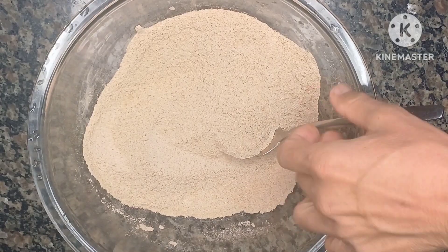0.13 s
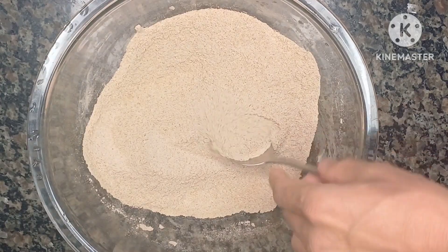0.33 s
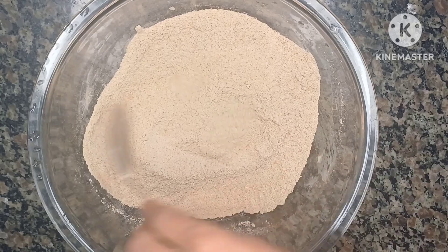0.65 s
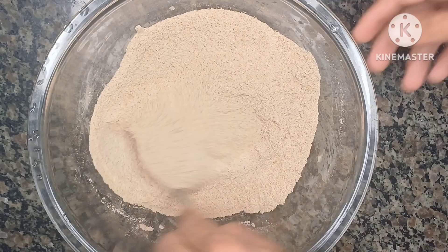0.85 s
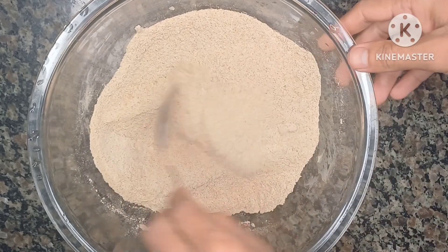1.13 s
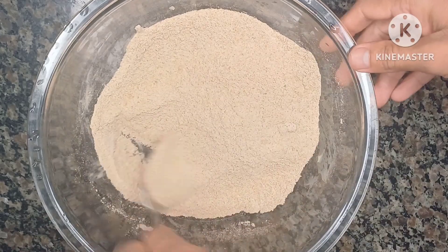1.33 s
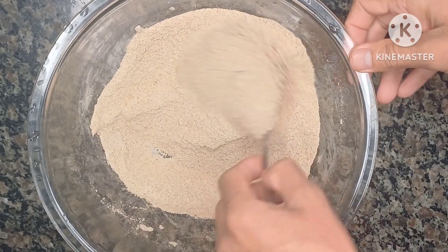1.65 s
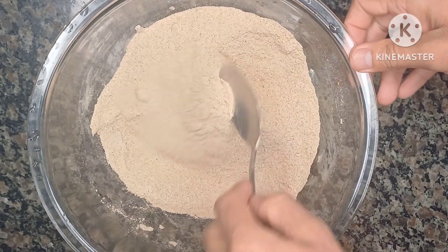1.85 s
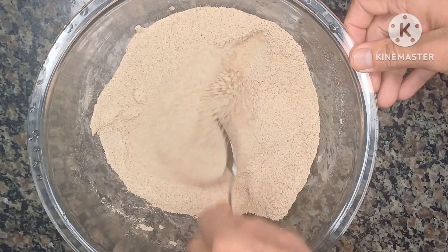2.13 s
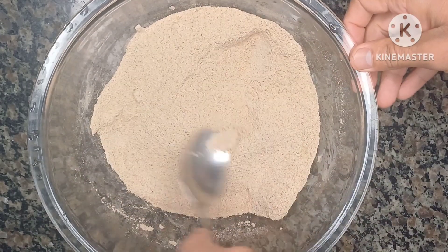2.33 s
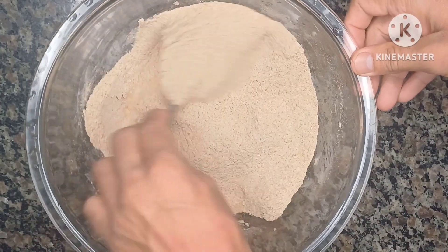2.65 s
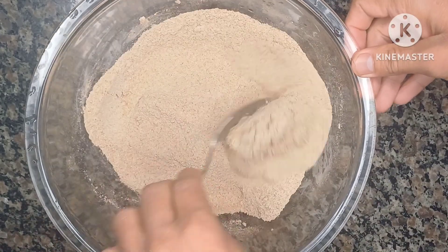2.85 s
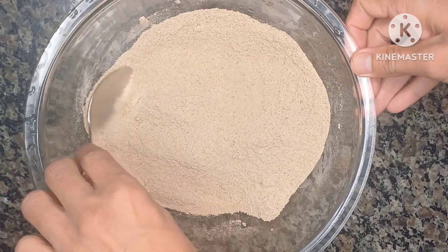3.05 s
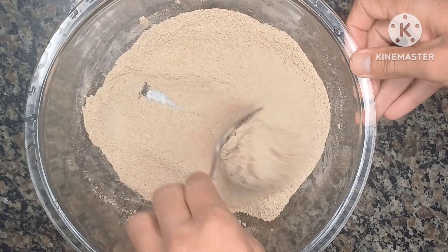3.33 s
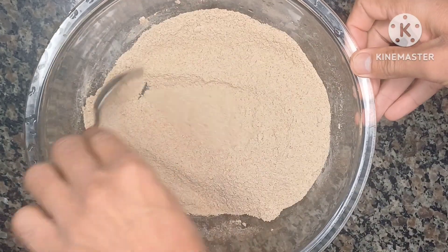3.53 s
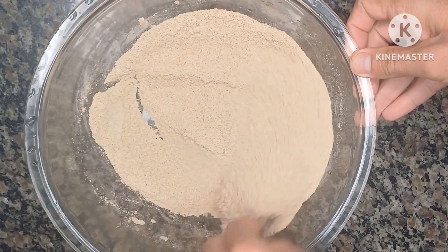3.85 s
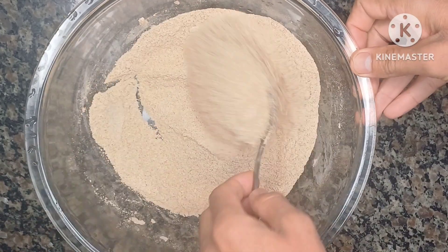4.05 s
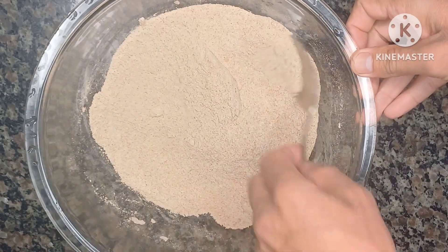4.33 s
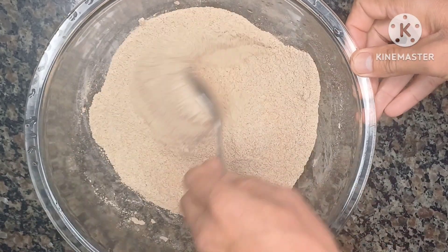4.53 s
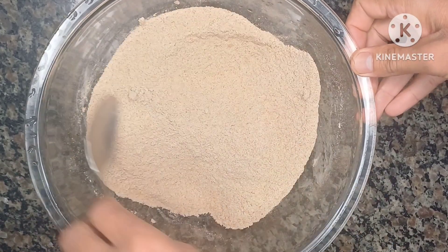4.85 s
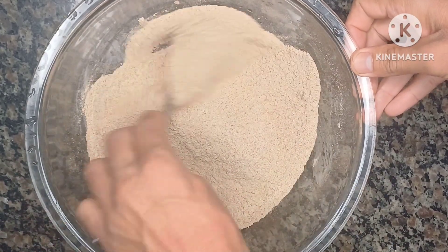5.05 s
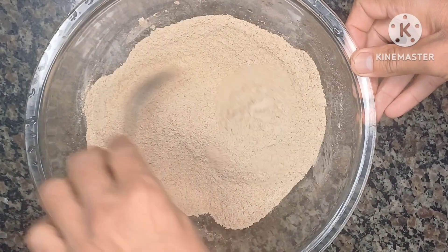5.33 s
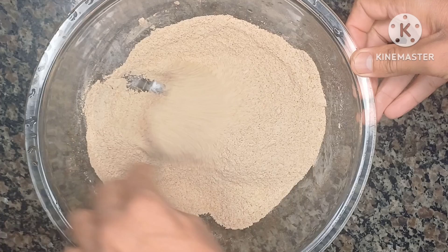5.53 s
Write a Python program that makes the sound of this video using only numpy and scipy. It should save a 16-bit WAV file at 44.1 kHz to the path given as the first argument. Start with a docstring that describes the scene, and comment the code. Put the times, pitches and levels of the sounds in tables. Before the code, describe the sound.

A metal spoon stirs dry flour and sugar in a glass bowl, in about eight short, uneven strokes. Each is a soft, gritty scrape with a hiss of sliding grains and light knocks on the powder-covered glass. Late on, the handle clinks against the rim and rings briefly. The bowl rocks softly on the counter. It is heard up close in a hard-walled kitchen with a faint appliance hum.

```python
"""Stirring flour and sugar

A metal spoon stirs flour and sugar in a glass bowl on a stone counter, in a hard-walled kitchen.
Each stroke crunches powder, grinds sugar against the glass and sets grains sliding. The spoon knocks
on the powder-covered bottom, rings in two short spells as its handle touches the rim, and squeaks
once. The bowl rocks softly on the counter, and an appliance hums underneath."""
import sys
import numpy as np
from scipy import signal
from scipy.fft import rfft, irfft
from scipy.io import wavfile
from scipy.ndimage import uniform_filter1d

SR = 44100
rng = np.random.default_rng(int(sys.argv[2]) if len(sys.argv) > 2 else 0)


def unload_audio(sound):
    """Save the sound as a 16-bit wav file, at the path given as the first command line argument."""
    columns = np.transpose(np.atleast_2d(sound))
    # keep every value between -1 and 1, then stretch to whole-number steps
    steps = np.round(np.clip(columns, -1, 1) * 32767)
    wavfile.write(sys.argv[1], SR, steps.astype(np.int16))


N = 251325
TIME = np.arange(N) / SR
FREQ = np.maximum(np.arange(2 ** 17 + 1) * SR / 2 ** 18, 1)  # the frequencies [Hz] that filters act on

# tone of the room's low rumble: (frequency [Hz], level [dB])
RUMBLE_TONE = [(25, -48.5), (45, -14.5), (76, -4), (105, -12.5), (200, -8.5), (330, -18), (600, -32.5),
               (1500, -41.5), (4500, -51.5), (15000, -50.5)]
# tones of the appliance's hum: (frequency [Hz], level [dB])
HUM_TONES = [(59.3, -49.5), (119.3, -56.5), (197, -69), (2860, -92.5)]
# noisy bands of its whirr: (frequency [Hz], width [Hz], level [dB])
WHIRR_BANDS = [(121.6, 17, -56.5), (6740, 530, -76.5)]
# the hand-held spoon's modes, or natural notes: (frequency [Hz], level [dB], time to fade 60 dB [s])
SPOON_MODES = [(441.5, -10, 0.33), (1109, -4, 0.048), (1137, -12, 0.33), (2150, -10, 0.33),
               (3315, -6.5, 0.19), (3360, -7.5, 0.1), (3520, -1.5, 0.069), (4780, -6.5, 0.096),
               (5170, -11, 0.061), (6153, -1.5, 0.086), (6190, -14, 0.42), (7140, -8.5, 0.12),
               (7700, -9.5, 0.086), (8460, -10.5, 0.23), (9700, -2, 0.071)]
# high modes of the spoon's cup: (frequency [Hz], width [Hz], level [dB])
CUP_MODES = [(7250, 700, -4), (8600, 400, -9), (9400, 300, -8), (11700, 550, -1), (12650, 450, -2),
             (13950, 400, -1), (14900, 700, -2)]
# modes of bowl and spoon, damped by powder and hand: (frequency [Hz], width [Hz], level [dB])
BOWL_MODES = [(424.4, 107, 0.5), (583, 340, -2.5), (887, 252, 16), (1080, 110, -3), (1650, 400, 14),
              (2163, 138, -6), (2650, 380, 3), (3280, 430, 3), (4500, 310, -2), (5470, 770, -10.5),
              (6300, 410, -54)]
# tone of grains cracking under a knock: (frequency [Hz], level [dB])
CRACK_TONE = [(600, -12), (1300, -19.5), (1750, -9), (2200, -1), (2700, 5.5), (4000, -12.5), (5200, -1.5),
              (7000, -17.5), (15000, -46)]
# tone of the filled bowl's thud: (frequency [Hz], level [dB])
THUD_TONE = [(25, -48), (60, -20), (130, -18.5), (260, -8), (480, -7), (680, -8.5), (1050, -5), (1400, -12),
             (2500, -25.5), (6000, -45.5)]
# tone of ticking, hissing grains: (frequency [Hz], level [dB])
GRAIN_TONE = [(2500, -2), (5000, 10.5), (7500, 5.5), (9800, 5.5), (12000, 11.5), (16000, 1.5)]
# the handle touches the bare rim: (time [s], level [dB], brightness [Hz])
RIM_TOUCHES = [(0.2553, -44, 1700), (0.2778, -45, 1940), (4.3306, -26, 13600), (4.3425, -25, 6900),
               (4.4343, -38, 2000)]
# the spoon hits the covered glass:
# (time [s], level [dB], weight [0 = edge catches, 1 = whole spoon lands], ping [Hz])
SPOON_KNOCKS = [(0.8693, -31.5, 0.16, 2500), (0.964, -33, 0.67, 890), (1.099, -59, 0.95, 450),
                (1.3064, -29, 0, 2650), (1.3725, -26.5, 0.025, 2617), (1.431, -27.5, 0.46, 1610),
                (2.0864, -18, 0.71, 1975), (2.6156, -28, 0.48, 1850), (2.645, -26, 0.66, 1650),
                (3.1272, -43, 0.13, 5400), (3.2214, -32, 0.18, 2590), (3.5827, -32.5, 0.78, 6100),
                (3.7193, -17, 0.0, 3570), (3.7635, -23, 0.38, 984), (4.329, -29.5, 0.91, 5060),
                (4.468, -30.5, 0.55, 1710), (5.0461, -29.5, 0, 1670), (5.129, -32, 0.82, 2340),
                (5.452, -39.5, 0.56, 6540), (5.5186, -29, 0.32, 2760), (5.5451, -23, 0.32, 2630)]
# powder slides off the spoon between strokes: (time [s], half length [s], level [dB])
SPILLS = [(.62, 0.092, -67.5), (1.11, 0.046, -63.5), (2.065, 0.046, -54.5), (2.85, 0.1, -65.5),
          (3.43, 0.034, -64)]
# strokes over the bottom: (start [s], length [s], run-in through the heap [s], force [dB],
# loose grains [dB], time of the press [s], press [dB], rocking [dB], plunge [dB])
STIR_STROKES = [(0.86, 0.122, 0.069, -44.5, -52, 0.9, 1, -46, 8.5),
                (1.287, 0.334, 0.0032, -44.5, -46.5, 1.463, 8, -53.5, 7.5),
                (2.549, 0.17, 0.028, -49, -52.5, 2.665, -7, -44.5, 2),
                (3.094, 0.1516, 0.0017, -53.5, -51, 3.222, 9.5, -48.5, 18),
                (3.58, 0.402, 0.001, -47.5, -47, 3.68, 11, -57, 16.5),
                (4.325, 0.1534, 0.00082, -46.5, -49.5, 4.47, 2.5, -49.5, 15.5),
                (4.989, 0.14, 0.017, -50, -54.5, 5.02, 9, -47, 7.5),
                (5.449, 0.22, 0.002, -51.5, -57.5, 5.562, 16, -62, 17.5)]


def undb(db):
    """Turn decibels into a gain to multiply by."""
    return 10 ** (np.asarray(db) / 20)


def unit(x):
    """Scale a sound to an average (rms) level of 1."""
    return x / np.sqrt(np.mean(x ** 2))


def shape(x, response):
    """Pass a sound through a filter given at each frequency in FREQ."""
    return irfft(rfft(x, 2 * len(FREQ) - 2) * response)[..., :x.shape[-1]]


def colour(points):
    """A filter through (frequency [Hz], level [dB]) points that never sounds ahead of its input."""
    hz, db = np.transpose(points)
    curve_db = np.interp(np.log(FREQ), np.log(hz), db)
    cepstrum = irfft(np.log(undb(curve_db)))
    cepstrum[1:len(FREQ) - 1] *= 2
    cepstrum[len(FREQ):] = 0
    return np.exp(rfft(cepstrum))


def resonance(hz, width):
    """A filter that lets through a band around hz."""
    return 1 / (1 + 1j * (FREQ ** 2 - hz ** 2) / (FREQ * width))


def wander(rate):
    """A smooth random wobble, about 1 in size, that turns about `rate` times a second."""
    hold = int(SR / rate)
    steps = np.repeat(rng.standard_normal(N // hold + 1), hold)
    return 1.136 * uniform_filter1d(steps, hold)[:N]


def clicks(rate, spread_db):
    """Tiny fractures of uneven size at random times, about `rate` a second."""
    size = undb(spread_db * np.clip(rng.standard_normal(N), -2, 2))
    return (rng.random(N) < rate / SR) * size * rng.choice([-1, 1], N)


def swells(table):
    """A gain that rises and falls softly around each row's time."""
    return sum(undb(db) * np.exp(-((TIME - s) / half) ** 2) for s, half, db in table)


def modes(drive, table):
    """Natural notes that flare and fade one by one as the point of contact wanders."""
    out = 0
    for hz, width, db in table:
        b, a = signal.iirpeak(hz, hz / (1.7 * width), fs=SR)
        flare_db = 4 * wander(28)
        out = out + undb(db + flare_db) * signal.lfilter(b, a, signal.lfilter(b, a, drive))
    return out


def background(rumble_db=-54, waver_db=4.0, bass_side=0.34):
    """An appliance's wavering hum and its whirr, over a low room rumble."""
    def air():
        mid, side = rng.standard_normal((2, N))
        return mid + np.array([[1], [-1]]) * shape(side, np.clip(FREQ / 700, bass_side, 1))
    out = undb(rumble_db) * unit(shape(air(), colour(RUMBLE_TONE)))
    for hz, width, db in WHIRR_BANDS:
        out += undb(db) * unit(shape(air(), resonance(hz, 2 * width) ** 2))
    for hz, db in HUM_TONES:
        level = np.sqrt(2) * undb(db + waver_db * wander(4.47))
        out += level * np.sin(2 * np.pi * hz * TIME + 0.29 * wander(4.0))
    return out


def kitchen(x, to_walls, low_fade_s=0.35, high_fade_s=0.26, build_s=0.001, treble_db=-1,
            pan_db=2.67, lead_s=0.0001273):
    """The direct sound is earlier on the left and louder on the right; hard walls add an echoing tail."""
    t = TIME[:SR]
    mid, side = rng.standard_normal((2, SR))
    side = shape(side, FREQ / np.hypot(FREQ, 350))  # left and right share the bass
    echoes = (mid + np.array([[1], [-1]]) * side) / np.sqrt(2)
    lows = shape(echoes, 1 / (1 + (FREQ / 4000) ** 2))
    tail = lows * np.exp(-np.log(1000) * t / low_fade_s)
    tail += undb(treble_db) * (echoes - lows) * np.exp(-np.log(1000) * t / high_fade_s)
    tail = unit(tail * (1 - np.exp(-t / build_s))) / np.sqrt(SR)
    direct = np.array([x * undb(-pan_db), np.interp(TIME - lead_s, TIME, x) * undb(pan_db)])
    return direct + signal.fftconvolve(tail, to_walls[None], axes=1)[:, :N]


def rocking(push, hz=133, wobble=0.42, settle_s=0.038, knock_db=-21, knock_s=0.071):
    """Pushed by strokes and heavy knocks, the bowl booms softly on the counter."""
    jolts = sum(undb(db + knock_db) * weight ** 2 * (TIME >= s) * np.exp(-np.abs(TIME - s) / knock_s)
                for s, db, weight, _ in SPOON_KNOCKS)
    carry = np.exp(-1 / (settle_s * SR))
    sway = signal.lfilter([1 - carry], [1, -carry], np.hypot(push, jolts))
    return np.sqrt(2) * sway * np.sin(2 * np.pi * hz * TIME + wobble * wander(25))


def squeak(at_s=5.646, half_s=0.0025, hz=4300, width_hz=350, db=-42):
    """The spoon's edge catches on bare glass for an instant."""
    whistle = unit(shape(rng.standard_normal(N), resonance(hz, width_hz) ** 2))
    return swells([(at_s, half_s, db)]) * whistle


def clinks(grip_db=2.0, grip_shift=0.0021, touch_hz=2300, buzz_db=-8, buzz_s=0.033, buzz_shift=0.022):
    """The handle bounces on the rim: the spoon rings, and buzzes until it lifts clear."""
    out = np.zeros(N)
    t = TIME[:SR]
    for hz, mode_db, fade_s in SPOON_MODES:
        energy, chatter = np.zeros((2, N))
        for s, db, bright_hz in RIM_TOUCHES:
            # a light touch wakes only the middle modes
            size = undb(db + mode_db) / (1 + ((hz ** 2 - touch_hz ** 2) / (hz * bright_hz)) ** 2)
            at = int(s * SR)
            energy[at:at + SR] += (size * np.exp(-np.log(1000) * t / fade_s)) ** 2
            chatter[at:at + SR] += size * np.exp(-t / buzz_s)
        ring_hz = hz * (1 + grip_shift * wander(60))  # the grip unsettles the ring
        buzz_hz = hz * (1 + buzz_shift * (1 + wander(200)))  # the rim stiffens the spoon as they touch
        ring, buzz = np.sin(2 * np.pi * np.cumsum([ring_hz, buzz_hz], axis=1) / SR)
        out += np.sqrt(energy) * undb(grip_db * wander(90)) * ring
        out += undb(buzz_db) * chatter * wander(400) * buzz
    return out


def knocks(crack_db=-1, ping_db=-2, ping_s=0.0051, crush_s=0.0025, crush_db=-16, thud_s=0.014,
           thud_room_db=4):
    """Each knock crushes grains, pings and thuds the bowl; gives the direct sound and the walls' share."""
    direct, to_walls = np.zeros((2, 4, N))  # four rows each: crack, thud, tick, ping
    t = TIME[:4000]
    for s, db, weight, hz in SPOON_KNOCKS:
        thud_db = -20.5 + 13.5 * weight
        tick_db = -1 + 11 * weight + 10 * np.log2(hz / 2500)  # a sharper hit pings higher, ticks brighter
        room_db = -9 + 13.5 * weight  # a heavier blow sends more into the room
        smother = np.exp(1.9 * weight)  # a spoon that lands flat shortens its own ping
        decay = np.exp(-t / np.array([[crush_s], [thud_s], [crush_s]]))
        crush = (t == 0) + undb(crush_db) * rng.standard_normal((3, len(t))) * decay
        ping = np.sin(2 * np.pi * hz * t) * np.exp(-t / ping_s * smother)
        blow = np.vstack([crush, ping]) * undb(db + np.array([[crack_db], [thud_db], [tick_db], [ping_db]]))
        at = int(s * SR)
        direct[:, at:at + len(t)] += blow
        to_walls[:, at:at + len(t)] += blow * undb(room_db)
    to_walls[1] *= undb(thud_room_db)  # the whole bowl sends out the thud
    tones = map(colour, (CRACK_TONE, THUD_TONE, GRAIN_TONE))
    filters = np.array([tone / np.abs(irfft(tone)).max() for tone in tones] + [resonance(2370, 5300)])
    return shape(direct, filters).sum(axis=0), shape(to_walls, filters).sum(axis=0)


def strokes(attack_s=0.001, release_s=0.0094, run_in_db=-1, slow_db_per_s=16, press_s=0.033,
            flick_s=0.012, flick_db=5):
    """Each stroke bites, slows, presses and flicks out; gives gains for grind, crunch, slide, rocking."""
    gains = np.zeros((4, N))
    for s, length, run_in, force_db, grains_db, press_at, press_db, rock_db, _ in STIR_STROKES:
        age = np.maximum(TIME - s, 0)
        bite = 1 - np.exp(-age / (attack_s + 0.13 * run_in))  # a longer run-in softens the start
        contact = bite * np.exp(-np.maximum(age - length, 0) / release_s)
        approach = undb(run_in_db) * np.exp(-np.abs(TIME - s) / max(run_in, 1e-4))
        flick = flick_db * np.exp(-((age - length) / flick_s + 1) ** 2)
        effort = flick - slow_db_per_s * age  # powder piles up ahead of the spoon and slows it
        press = press_db * np.exp(-((TIME - press_at) / press_s) ** 2)
        gains += [contact * undb(force_db + effort + press),
                  contact * undb(force_db + effort + 0.47 * press),
                  (contact + approach) * undb(grains_db + effort + 0.52 * press),
                  contact * undb(rock_db)]
    return gains


def plunge(deepest_s=0.028):
    """Extra dB for the lowest modes as the spoon dives in and shoves the whole heap."""
    ages = [(np.maximum(TIME - s, 0) / deepest_s, db) for s, *_, db in STIR_STROKES]
    return sum(db * age * np.exp(1 - age) for age, db in ages)


def stirring(grinding, crunching, sliding, grind_db=-5, crunch_db=-3, slide_db=-2, hiss_db=-8,
             rasp_db=-17, spill_db=-8, hollow_db=-6, plunge_share=0.076):
    """Sugar cracks under the spoon's edge, packed flour gives way in soft slips, loose grains hiss."""
    judder = undb(5.5 * wander(100))  # the spoon sticks and slips, so cracks come in bunches
    spill = swells(SPILLS)
    cracks = clicks(rate=800, spread_db=4.0) * judder
    rasp = undb(rasp_db) * shape(cracks, resonance(2700, 5400))
    grind = unit(modes(cracks, BOWL_MODES[5:]) + rasp) * (grinding + undb(spill_db) * spill)

    plunge_db = plunge()
    slips = clicks(rate=1400, spread_db=3.0)
    hollow = undb(hollow_db + plunge_db) * unit(modes(slips, BOWL_MODES[:2]))
    middle = undb(plunge_share * plunge_db) * unit(modes(slips, BOWL_MODES[2:5]))
    crunch = (middle + hollow) * crunching

    grains = clicks(rate=4000, spread_db=5) * np.sqrt(judder)  # they tick against the spoon's cup
    hiss = undb(hiss_db) * shape(grains, colour(GRAIN_TONE))
    slide = unit(modes(grains, CUP_MODES) + hiss) * (sliding + spill)
    return undb(grind_db) * grind + undb(crunch_db) * crunch + undb(slide_db) * slide


def scene():
    """Spoon and bowl in the humming kitchen, in stereo."""
    grinding, crunching, sliding, push = strokes()
    spoon = stirring(grinding, crunching, sliding) + clinks()
    knock, knock_to_walls = knocks()
    return kitchen(spoon + knock + squeak(), spoon + knock_to_walls) + rocking(push) + background()


def record(dry):
    """Cut the highest treble, above 15700 Hz."""
    return signal.sosfilt(signal.ellip(10, .2, 80, 15700, fs=SR, output="sos"), dry)


dry = scene()
out = record(dry)
unload_audio(out)
```